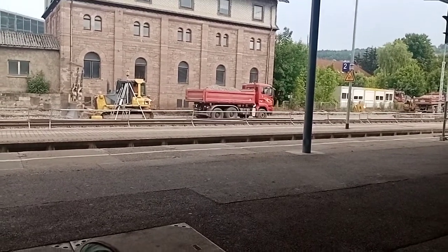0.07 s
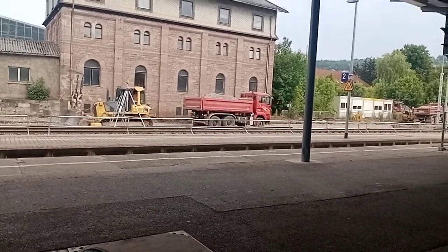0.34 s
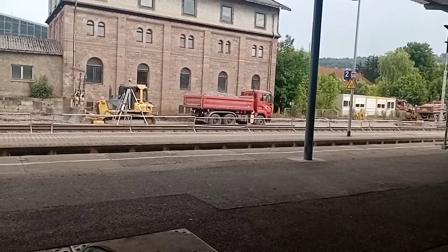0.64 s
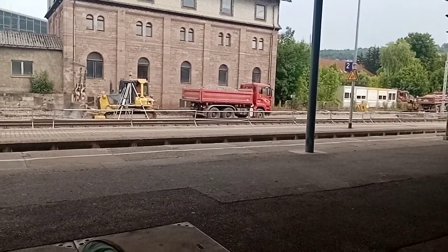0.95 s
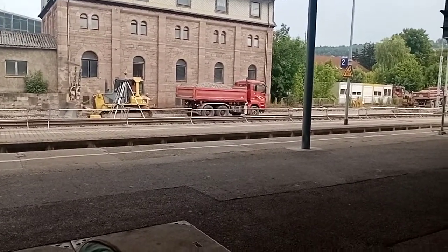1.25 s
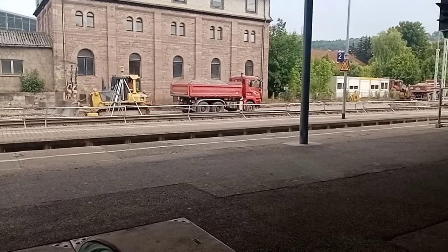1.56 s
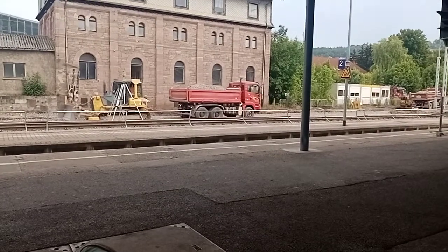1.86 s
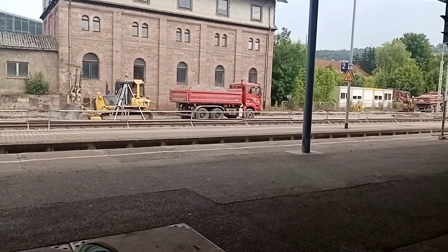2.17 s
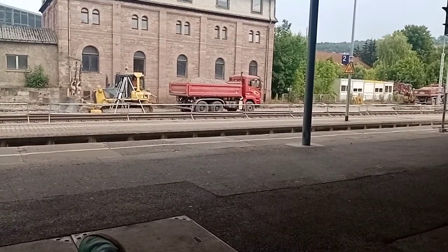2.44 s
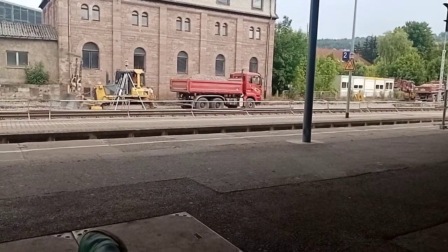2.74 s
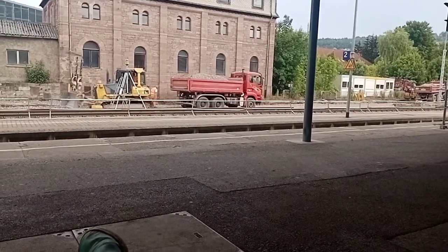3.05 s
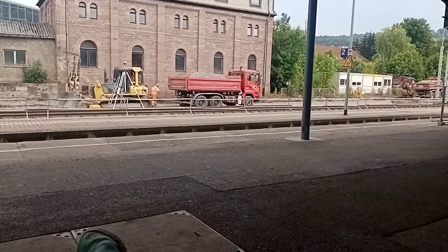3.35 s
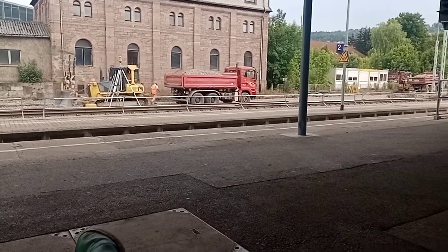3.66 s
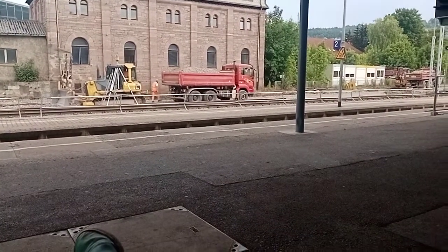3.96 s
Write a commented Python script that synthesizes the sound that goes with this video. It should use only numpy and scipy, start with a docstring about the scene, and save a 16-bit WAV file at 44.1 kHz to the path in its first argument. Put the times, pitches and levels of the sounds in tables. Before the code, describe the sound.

A diesel engine idles across railway tracks, humming, clattering and knocking steadily. A broad machinery roar with a few hollow bumps fades after two seconds, while puffs of wind rumble on the microphone on the open station platform.

```python
"""From the start, a six-cylinder diesel idles across the railway tracks, heard from a platform in front
of a stone building. It hums, clatters and knocks hard once a cycle, under a broad roar of machinery.
Early on, wind hoots over the left of two microphone ports (openings). From about one second, puffs
rumble on both and hollow bumps sound in the roar. After two seconds the roar dies away.
The engine runs on, and a last puff comes just before the end."""
import sys
import numpy as np
from scipy.fft import rfft, irfft, next_fast_len
from scipy.io import wavfile
from scipy.ndimage import uniform_filter1d, map_coordinates

SR = 44100
rng = np.random.default_rng(int(sys.argv[2]) if len(sys.argv) > 2 else 0)


def put_to_file(sound):
    """Save the sound as 16-bit audio at rate SR, in the file named by the first command-line argument."""
    columns = np.atleast_2d(sound).T  # one column per channel
    safe = np.clip(columns, -1, 1)
    whole_steps = np.round(safe * 32767)
    wavfile.write(sys.argv[1], SR, whole_steps.astype(np.int16))


N = 176400

CYCLE_HZ, CYLINDERS = 6.972, 6  # each cylinder fires once a cycle
ENGINE_LEAD_S, ROAR_LEAD_S = 0.00045, 0.00031  # how much sooner sound reaches the left port, at most

# Share of that head start at each pitch: f/Hz, share
LEAD_SHARE = [(250, .05), (600, 0.51), (950, 0.24), (1250, 0.85), (2500, 1), (3500, 0.91)]
# How much louder distant sound is on the left than on the right: f/Hz, level/dB
LEFT_OVER_RIGHT = [(40, -10), (100, 16.5), (200, -0.6), (750, -1), (1250, -3.5), (2400, -4), (4400, -4),
                   (8100, 7), (15000, -2)]
# Tone colour of the breeze (how strong each pitch is next to the others): f/Hz, level/dB
BREEZE_COLOUR = [(20, -20), (45, 10.5), (70, 2), (140, -12), (500, -64.5)]
# Strength of the breeze, left row then right row: level/dB
BREEZE_LEVELS = [
    [-55],
    [-50.5],
]
# Faint rustles: t/s, half width/s, level/dB
RUSTLE_SWELLS = [(1.27, 0.07, -69), (1.82, 0.055, -65.5), (2.72, .05, -77), (3.99, .055, -64)]
# Their tone colour: f/Hz, level/dB
RUSTLE_COLOUR = [(2000, -26), (5000, 2.5), (7600, -10.5), (9500, 2.5), (13000, -13), (15300, -10)]
# Thin, very high hisses: t/s, half width/s, level/dB
SIZZLE_SWELLS = [(.175, 0.025, -63), (3.99, .04, -58)]
# Their tone colour: f/Hz, level/dB
SIZZLE_COLOUR = [(13000, -25), (15200, -4)]
# Wind hoots, one list of points for each: t/s, f/Hz, level/dB
HOOT_GLIDES = [
    [(.21, 103.7, -34), (.33, 152.5, -30.5), (.44, 118, -41)],
    [(1.19, 103.7, -39), (1.34, 159, -26), (1.44, 280, -40)],
]
# Puffs of wind: t/s, half width/s, left level/dB, right level/dB
WIND_PUFFS = [(1.0, 0.057, -29, -30), (1.31, 0.1, -30.5, -33), (1.504, 0.019, -24, -17),
              (1.642, 0.015, -29, -17), (1.696, 0.034, -39, -20.5), (2.04, 0.039, -23.5, -42),
              (2.19, .04, -27.5, -29), (2.34, 0.037, -44, -29), (3.87, 0.098, -38.5, -37)]
# Their tone colour: f/Hz, level/dB
WIND_COLOUR = [(20, -27), (45, -21), (62, -7.5), (78, 6), (120, 2), (170, -1), (280, -9.5), (500, -14.5),
               (1200, -35), (4000, -75.5)]
# Rise and fall of the roar's hiss, before roar() widens and lifts it: t/s, level/dB
HISS_SHAPE = [(0, -41), (.3, -39.5), (.8, -39.5), (1.4, -39.5), (1.9, -40.5), (2.32, -42), (2.52, -44.5),
              (3.2, -47.5), (4, -46.5)]
# Tone colour of that hiss: f/Hz, level/dB
HISS_COLOUR = [(200, -18.5), (700, -8), (1200, 3.5), (1800, -1.5), (2900, -1), (3700, -10.5), (5400, -20),
               (6500, -33.5), (7700, -49.5), (9300, -34.5), (13000, -56.5), (15500, -46)]
# Gritty scrapes in that hiss: t/s, half width/s, level/dB
SCRAPE_SWELLS = [(.92, 0.032, -36), (1.27, 0.068, -36.5), (2.28, 0.018, -33.5)]
# Loudness of the roar's low body: t/s, level/dB
BODY_LEVEL = [(0, -29.5), (1.9, -29), (2.05, -27), (2.37, -31.5), (2.44, -31.5), (2.8, -38), (4, -42.5)]
# Tone colour of that body: f/Hz, level/dB
BODY_COLOUR = [(30, -39.5), (70, -10.5), (130, -7), (185, -3.5), (235, 2), (320, 0.5), (450, -5.5),
               (1000, -11.5), (1500, -18.5), (3000, -73)]
# How alike the machinery sounds left and right: f/Hz, likeness (0 to 1)
ROAR_ALIKE = [(50, 0.52), (200, 0.92), (480, 0.8), (700, .45), (1300, 0.66), (1600, 0.6), (2100, 0.15),
              (12000, 0.17)]
# Hollow bumps of the work: t/s, relative level/dB, fade time/s, f/Hz
BUMPS = [(0.852, -22, 0.031, 298), (0.889, -25.5, 0.047, 346.3), (1.158, -24.5, 0.025, 245.5),
         (1.669, -25.5, 0.034, 275), (2.027, -26, 0.012, 228), (2.078, -34, 0.0082, 261),
         (2.271, -20.5, 0.014, 237), (2.353, -22, 0.0071, 237), (3.078, -34.5, 0.039, 336.6)]
# The engine's whines: rough f/Hz, relative level/dB
ENGINE_WHINES = [(349, -52), (390, -45), (488, -46.5), (502, -47), (544, -54), (816, -50.5), (962, -52),
                 (1102, -50), (1185, -52)]
# Tone colour of the clatter: f/Hz, level/dB
CLATTER_COLOUR = [(25, -31), (45, -24.5), (100, -5.5), (170, -7), (370, -5), (450, -8), (820, -7),
                  (900, -10), (1150, 0), (1450, -11), (2700, -21), (4000, -40), (5500, -55.5),
                  (7600, -72.5), (9300, -62), (13000, -64.5), (15500, -50.5)]
# How alike the clatter sounds left and right: f/Hz, likeness (0 to 1)
CLATTER_ALIKE = [(250, 0.76), (500, 0.43), (660, 0.14), (820, .6), (1370, 0.49), (1520, 0.78), (2550, 0.46),
                 (3000, 0.32)]
# Cylinders that knock: share of the cycle, relative level/dB
KNOCKING_CYLINDERS = [(0, 0), (1 / 6, -11.5), (.5, -13)]
# Tone colour of a knock: f/Hz, level/dB
KNOCK_COLOUR = [(200, -33.5), (800, -11), (1170, -1), (1350, -18), (3000, -19), (6000, -61.5)]
# How hard the engine knocks: t/s, relative level/dB
KNOCK_FORCE = [(0, -3.5), (.6, -2.5), (1.2, -4.5), (2.1, -0.5), (2.5, -1.5), (3.22, -2.5), (3.37, -5),
               (3.7, -5.5), (3.92, -1.5)]


def amp(db):
    """Turn decibels into a number to multiply by."""
    return 10 ** (np.asarray(db) / 20)


def unit(x):
    """Scale to an average strength (rms) of 1."""
    return x / np.sqrt(np.mean(x ** 2) + 1e-20)


def along(points, hz):
    """Read between (f/Hz, value) points, with octaves evenly spaced."""
    f, v = np.transpose(points)
    return np.interp(np.log(hz + 1), np.log(f + 1), v)


def clock():
    """Time of each sample in seconds."""
    return np.arange(N) / SR


def curve(rows):
    """Join (t/s, value) points with straight lines."""
    return np.interp(clock(), *np.transpose(rows))


def wobble(rate):
    """A smooth curve through `rate` random values a second."""
    return map_coordinates(rng.standard_normal(int(N * rate / SR) + 4), [clock() * rate])


def bell(s, width):
    """A smooth swell of height 1 around time s."""
    return np.exp(-((clock() - s) / width) ** 2 / 2)


def swells(rows):
    """Add up swells given as (t/s, half width/s, level/dB)."""
    return sum(amp(db) * bell(s, width) for s, width, db in rows)


def filtered(x, response):
    """Change the strength and phase of each frequency in x by response(hz)."""
    size = next_fast_len(N + SR // 4)
    return irfft(rfft(x, size) * response(np.fft.rfftfreq(size, 1 / SR)), size)[..., :N]


def noise():
    """Two unrelated white noises."""
    return rng.standard_normal((2, N))


def coloured_noise(colour):
    """Two unrelated noises with this tone colour, at strength 1."""
    return unit(filtered(noise(), lambda hz: amp(along(colour, hz))))


def pan_right(db):
    """Left and right gains that make the right louder by db."""
    return amp([[-db / 2], [db / 2]])


def ports(hz, lead_s=ENGINE_LEAD_S):
    """Strength and phase at the left and right port for sound from across the tracks."""
    left = amp(along(LEFT_OVER_RIGHT, hz) / 2) * np.exp(1j * np.pi * hz * along(LEAD_SHARE, hz) * lead_s)
    return np.array([left, 1 / left])


def distant(pair, colour, lead_s=ENGINE_LEAD_S, alike=ROAR_ALIKE):
    """Blend two unrelated noises into one far, partly spread-out source of strength 1."""
    def blend(hz):
        angle = np.arccos(np.clip(along(alike, hz), 0, 1)) / 2
        return amp(along(colour, hz)) * [np.cos(angle), np.sin(angle)]
    mid, side = filtered(pair, blend)
    return unit(filtered(np.array([mid + side, mid - side]), lambda hz: ports(hz, lead_s)))


def distant_tone(hz, phase):
    """A pure tone from across the tracks, as the two ports hear it."""
    return np.real(ports(hz)[:, None] * np.exp(1j * phase))


def breeze(swing_db=4):
    """Light air keeps up a faint, lumpy rumble on each port."""
    lumps = amp(swing_db * np.array([wobble(11), wobble(8)]))
    return amp(BREEZE_LEVELS) * unit(lumps * coloured_noise(BREEZE_COLOUR))


def rustle(flutter_db=3):
    """Faint, uneven high rustling close by."""
    return swells(RUSTLE_SWELLS) * amp(flutter_db * wobble(70)) * coloured_noise(RUSTLE_COLOUR)


def sizzle():
    """Brief, thin hisses at the very top of the treble, to the right."""
    return pan_right(db=7) * swells(SIZZLE_SWELLS) * coloured_noise(SIZZLE_COLOUR)


def tick(at_s=1.516):
    """A tiny dry click, like a glitch, the same on both sides: one spike spread over two samples."""
    spike = amp(-26) * (np.arange(N) == round(at_s * SR))
    return uniform_filter1d(spike, size=2)


def hoots(rough_db=-0.5):
    """Air swirling over the left port makes a rough, low tone, higher as it blows faster."""
    t, left = clock(), np.zeros(N)
    for glide in HOOT_GLIDES:
        s, hz, db = np.transpose(glide)
        phase = 2 * np.pi * np.cumsum(np.interp(t, s, hz)) / SR + 1.2 * wobble(46)
        level = np.interp(t, s, amp(db)) * (t > s[0]) * (t < s[-1])
        softened = uniform_filter1d(level, size=900)  # no click at either end
        left += softened * amp(rough_db * wobble(45)) * np.sin(phase)
    return np.sqrt(2) * np.array([left, np.zeros(N)])


def wind():
    """Short puffs rumble on each port separately."""
    puffs = sum(amp([[left], [right]]) * bell(s, width) for s, width, left, right in WIND_PUFFS)
    return puffs * coloured_noise(WIND_COLOUR)


def roar(widen=1.59, lift_db=5):
    """Working machinery: a low body and a gritty, scraping hiss that die away together."""
    shape = curve(HISS_SHAPE)
    hiss_db = shape.max() + widen * (shape - shape.max()) + lift_db + 0.5 * wobble(24.24)
    hiss = np.hypot(amp(hiss_db), swells(SCRAPE_SWELLS)) * distant(noise(), HISS_COLOUR, ROAR_LEAD_S)
    body = amp(curve(BODY_LEVEL) + 0.98 * wobble(18)) * distant(noise(), BODY_COLOUR)
    return hiss + body


def bumps(rise_s=0.0062, noise_db=-2):
    """Dull, hollow bumps within the roar: each a short low ring in a puff of noise."""
    swell, ring = np.zeros(N), np.zeros(N)
    for s, db, fade_s, hz in BUMPS:
        age = np.maximum(clock() - s, 0)
        blow = amp(db) * (1 - np.exp(-age / rise_s)) * np.exp(-age / fade_s)
        swell += blow
        ring += blow * np.sin(2 * np.pi * hz * age + 0.6 * wobble(60))
    return 2 * ring + amp(noise_db) * swell * distant(noise(), BODY_COLOUR)


def engine_tones(cycles, drone_hz=62.2, waver_db=3.5, wander_per_khz=0.6):
    """The exhaust hums at twice the firing rate, with engine whines and a weaker, unrelated drone."""
    angle = 2 * np.pi * cycles
    hum = amp(-39 + 0.85 * wobble(7.9)) * np.sin(2 * CYLINDERS * angle)
    drone = amp(-54.5 + waver_db * wobble(4.3)) * np.sin(2 * np.pi * drone_hz * clock())
    whines = np.zeros((2, N))
    for hz, db in ENGINE_WHINES:
        order = np.round(hz / CYCLE_HZ)  # a whole number of waves in each engine cycle
        phase = order * angle + rng.uniform(0, 2 * np.pi) + wander_per_khz * hz / 1000 * wobble(8)
        whines += amp(db - 2 + waver_db * wobble(4.41)) * distant_tone(hz, phase)
    return np.sqrt(2) * (hum + drone + whines)


def engine_clatter(cycles, level_db=-34.5, repeat_share=0.2, pulse_depth=0.23):
    """Burning fuel makes a noise that is partly the same every cycle and swells at each firing."""
    size = int(SR / CYCLE_HZ)
    place_in_cycle = (cycles % 1 * size).astype(int) % size
    repeating = rng.standard_normal((2, size))[:, place_in_cycle]
    pulsing = 1 + pulse_depth * np.cos(2 * np.pi * CYLINDERS * cycles)
    level = amp(level_db + 0.58 * wobble(5.64))
    burning = np.sqrt(repeat_share) * repeating + np.sqrt(1 - repeat_share) * noise()
    return level * distant(pulsing * burning, CLATTER_COLOUR, alike=CLATTER_ALIKE)


def engine_knock(cycles, rise_s=0.008, fade_s=0.026, ring_hz=1061):
    """Three cylinders, one above all, knock and make the engine casing ring."""
    power = np.zeros(N)
    for share, db in KNOCKING_CYLINDERS:
        age = (cycles - share) % 1 / CYCLE_HZ  # seconds since this cylinder last knocked
        power += (amp(db) * (1 - np.exp(-age / rise_s)) * np.exp(-age / fade_s)) ** 2
    blow = np.sqrt(power)
    phase = 2 * np.pi * ring_hz * clock() + 0.17 * wobble(25)
    ring = np.sqrt(2) * blow * amp(-29.5) * distant_tone(ring_hz, phase)
    clack = amp(-45) * distant(blow * noise(), KNOCK_COLOUR)
    return amp(curve(KNOCK_FORCE)) * pan_right(db=7.5) * (ring + clack)


def scene():
    """The engine's slightly unsteady cycle drives its sounds; roar and wind lie over it."""
    cycles = (clock() - 2.484) * CYCLE_HZ + 0.0012 * wobble(2.967)  # a hard knock at each whole number
    engine = engine_tones(cycles) + engine_clatter(cycles) + engine_knock(cycles)
    return engine + roar() + bumps() + wind() + hoots() + breeze() + rustle() + sizzle() + tick()


def record(dry):
    """Cut away the highest treble, above 15800 Hz."""
    return filtered(dry, lambda hz: hz < 15800)


dry = scene()
out = record(dry)
put_to_file(out)
```